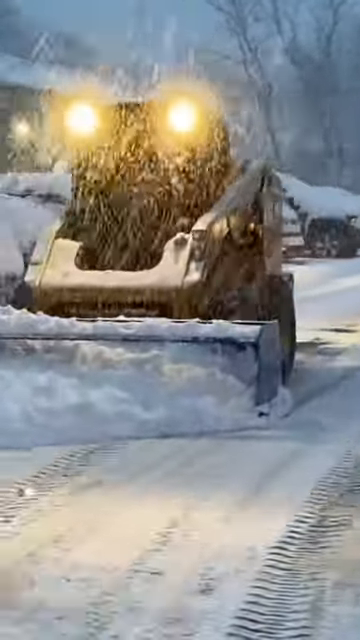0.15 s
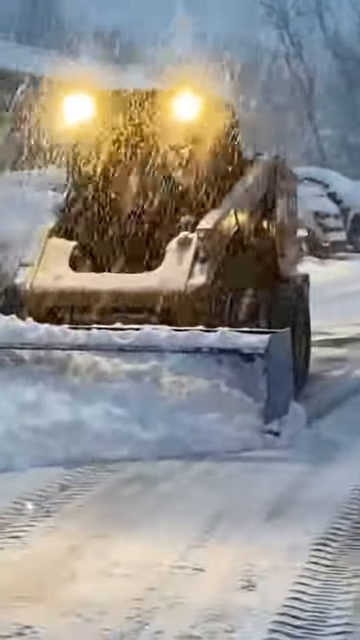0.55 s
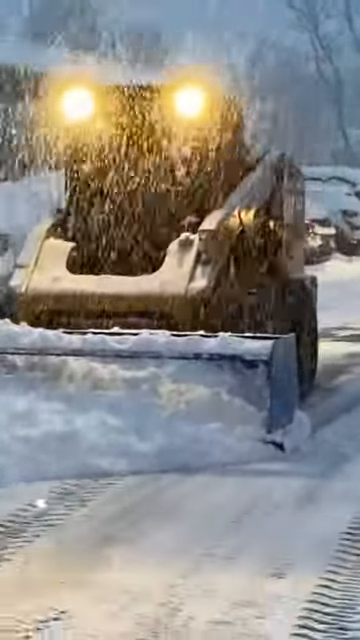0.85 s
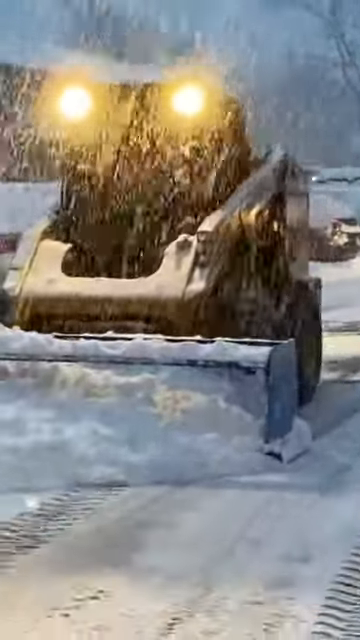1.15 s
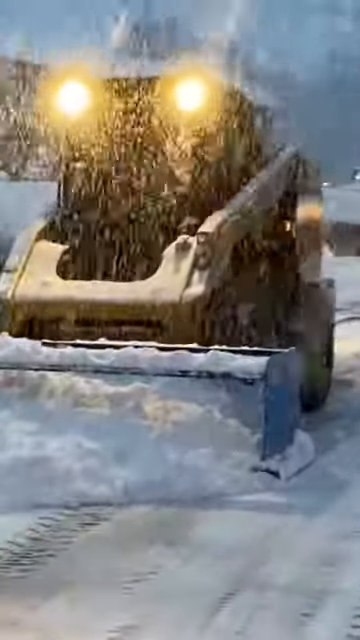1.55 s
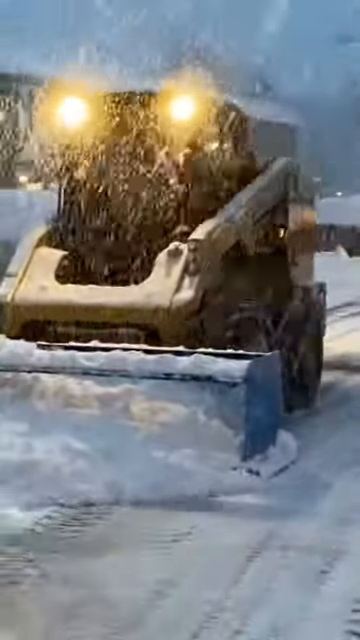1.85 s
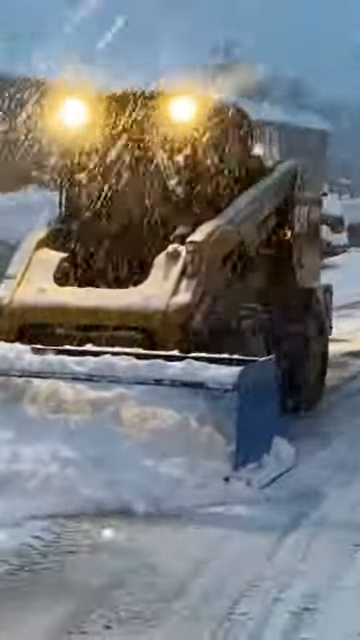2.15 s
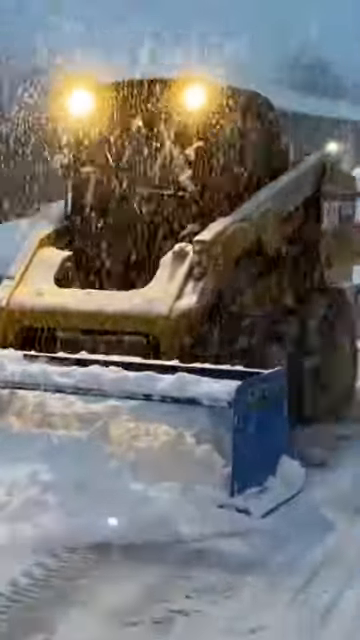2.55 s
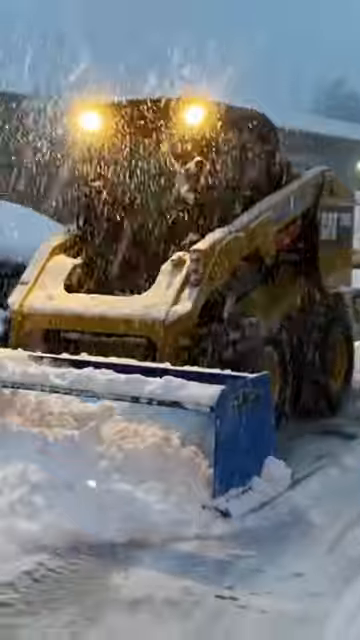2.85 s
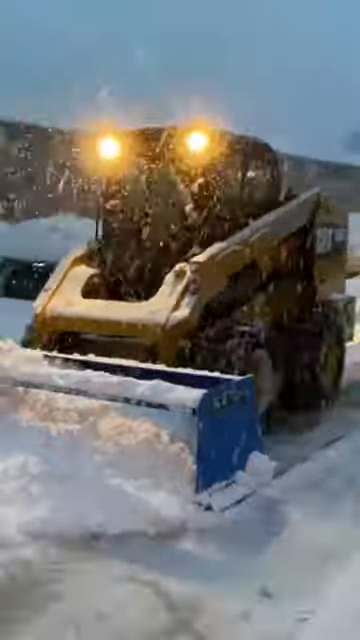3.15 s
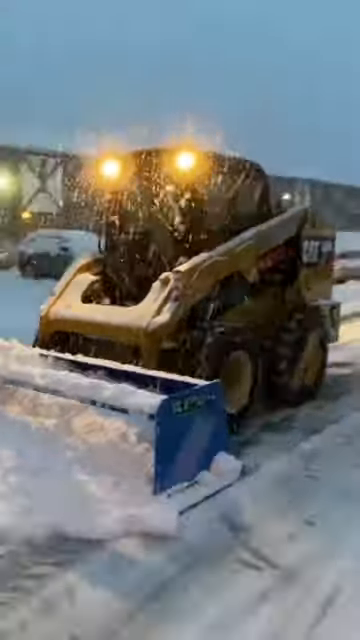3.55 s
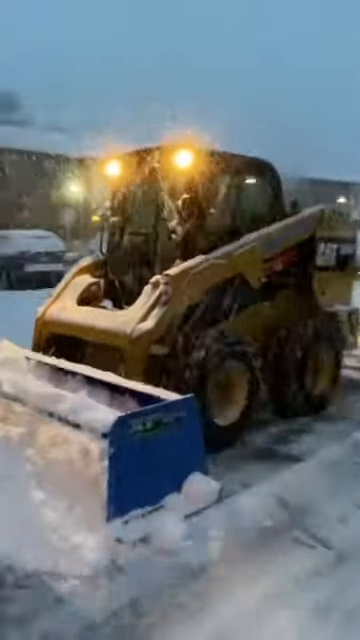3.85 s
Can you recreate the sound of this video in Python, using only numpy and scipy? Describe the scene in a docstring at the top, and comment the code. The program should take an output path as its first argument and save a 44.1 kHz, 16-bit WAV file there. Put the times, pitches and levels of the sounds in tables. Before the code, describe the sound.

A four-cylinder diesel loader drones at nearly constant engine speed, a low buzz near 70 Hz under rough clatter and airy hiss. Faint ticks come at the start and a dull low bump near 1 s. Clatter swells as it nears; pump whine strengthens after 2.6 s with a small knock. From about 3 s faint scraping joins, the sound widens rightward, and it is loudest around 3.7 s, with a soft bump, still running at the end.

```python
"""A diesel drone under steady clatter and hiss: a four-cylinder loader pushes snow across an open lot,
draws near and passes to the right. Exhaust is sines on the firing rate, pump and gear whine is
tones on shaft multiples, and block clatter is noise that partly repeats each engine cycle. Fan air and
sliding snow are the fresh noise in it; ticks, blade bumps and scrapes are swelling noise bands."""
import sys
import numpy as np
from scipy import signal
from scipy.fft import rfft, irfft
from scipy.io import wavfile

SR = 44100
rng = np.random.default_rng(int(sys.argv[2]) if len(sys.argv) > 2 else 0)


def log_audio(samples):
    """Write samples as a 16-bit WAV file to the path given in sys.argv[1]."""
    # one column per channel
    frames = np.atleast_2d(samples).T
    # limit to full scale, then quantise
    limited = np.clip(frames, -1, 1)
    pcm = np.round(limited * 32767).astype(np.int16)
    wavfile.write(sys.argv[1], SR, pcm)


N = 175959


def amp(db):
    """Decibels to gain."""
    return 10 ** (np.asarray(db) / 20)


def rms_one(x):
    """Scale to unit rms."""
    return x / np.sqrt(np.mean(x ** 2) + 1e-20)


def in_time(rows):
    """Columns of a time table, interpolated at every sample."""
    s, *columns = np.transpose(rows)
    return [np.interp(np.arange(N) / SR, s, c) for c in columns]


def bin_hz():
    """Frequency of every FFT bin."""
    return np.arange(N // 2 + 1) * SR / N


def at_hz(points):
    """A frequency table at every FFT bin, interpolated over log frequency."""
    table_hz, values = np.transpose(points)
    return np.interp(np.log(np.maximum(bin_hz(), 1)), np.log(table_hz), values)


def drift(pole_hz):
    """Slow random curve of about unit rms: noise through a double real pole, at SR / 40."""
    step, settle = 40, 2000
    r = np.exp(-2 * np.pi * pole_hz * step / SR)
    noise = rng.standard_normal(N // step + 2 + settle)
    slow = signal.lfilter([1], [1, -2 * r, r * r], noise)[settle:]
    return np.interp(np.arange(N) / step, np.arange(len(slow)), rms_one(slow))


def panned(x, pan_db):
    """Stereo pair with the given left minus right level."""
    return np.array([x * amp(pan_db / 2), x * amp(-pan_db / 2)])


def exhaust(cycle, level_db):
    """Downward pressure pulses as sines; multiples between the firings come from unequal cylinders."""
    # exhaust tones: multiple of the four-firing cycle, relative_level_db
    exhaust_tones = [(3, -18), (4, 1), (5, -17.5), (6, -20), (7, -16), (8, -7), (10, -25.5), (11, -23),
                     (12, -17.5), (16, -27)]
    firing_waver_db, odd_waver_db = .5, 2.5
    out = 0
    for k, db in exhaust_tones:
        k = round(k)
        if k % 4 == 0:
            start_rad, waver_db = 0, firing_waver_db
        else:
            # uneven strokes slip in phase
            start_rad = rng.uniform(0, 2 * np.pi) + drift(0.89)
            waver_db = odd_waver_db
        gain = amp(db + waver_db * drift(2.15))
        out = out - gain * np.cos(2 * np.pi * k * cycle + start_rad)
    return np.sqrt(2) * amp(level_db) * out


def shaft_tone(cycle, multiple):
    """Unit-rms tone locked to the shaft, blurred by its uneven turning."""
    jitter_cycles = .0006
    turns = cycle + jitter_cycles * drift(16.0)
    return np.sqrt(2) * np.cos(2 * np.pi * (round(multiple) * turns + rng.random()))


def whine(cycle, near):
    """Pump pistons and gear teeth meet at shaft multiples; one pump partial rises with load."""
    # second partial of the piston pump: time_s, level_db
    pump_load = [(0, -55), (.7, -58), (1.1, -48.5), (1.6, -45), (2.5, -48), (2.66, -36), (3.2, -34.5),
                 (3.6, -36.5), (3.99, -33)]
    # pump and gear tones: multiple of the cycle (rounded in use), far_db, near_db,
    # pan_db (left minus right, scaled by nearness)
    whine_tones = [(18, -38, -39, 2.5), (24, -56.5, -47, 9), (32, -55, -41, -10), (48, -50.5, -41.5, -8),
                   (54, -55, -57, 7), (72, -57, -48.5, -10), (107.7, -66, -62, -19),
                   (145.2, -61.5, -59, 13), (160.8, -61.5, -55.5, 1), (182.6, -76, -59, -6),
                   (189, -64, -63, 6), (213, -86, -59, -2)]
    pump_multiple, pump_pan_db, pump_waver_db = 36, -8, 1.6
    waver_db = .25  # per root of the multiple
    [load_db] = in_time(pump_load)
    pump_gain = amp(load_db + pump_waver_db * drift(6.2))
    out = panned(pump_gain * shaft_tone(cycle, pump_multiple), pump_pan_db)
    for k, far_db, near_db, pan_db in whine_tones:
        distance_db = far_db + near * (near_db - far_db)
        gain = amp(distance_db + waver_db * np.sqrt(k) * drift(2.7))
        out += panned(gain * shaft_tone(cycle, k), pan_db * near - 1.5)
    return out


def repeating_contacts(cycle):
    """Contacts that recur each cycle: four noise loops whose drifting weights slowly renew the pattern."""
    loop_samples, renew_hz = 2600, 1.76
    loops = rng.standard_normal((4, loop_samples))
    weights = np.array([drift(renew_hz) for _ in loops])
    position = (cycle % 1 * loop_samples).astype(int)
    return np.sum(weights * loops[:, position], axis=0) / np.linalg.norm(weights, axis=0)


def patchy(x):
    """Each half octave swells and sinks on its own; the upper middle also follows its level curve."""
    # upper middle leads the approach, then eases: time_s, level_db
    presence = [(0, -1), (.7, 1.5), (1.5, 1.5), (2.3, 1.5), (3.0, 1), (3.4, -0.5), (3.7, -2), (3.99, -1.5)]
    low_hz, high_hz, patchy_db = 1100, 6000, .7
    [presence_db] = in_time(presence)
    spectrum = rfft(x)

    def half_octave(hz):
        return 2 * np.log2(1 + hz / 150)  # bands widen below about 150 Hz, spanning more than half an octave

    band = np.round(half_octave(bin_hz()))
    out = 0
    for k in np.unique(band):
        in_middle = half_octave(low_hz) < k < half_octave(high_hz)
        gain = amp(patchy_db * drift(1.34) + presence_db * in_middle)
        out = out + gain * irfft(spectrum * (band == k), N)
    return out


def clatter_sources(cycle):
    """Spectra of the direct clatter, cyclic contacts mixed with fresh noise, and of a diffuse noise."""
    # power share of the clatter that repeats each cycle: frequency_hz, share_0_to_1
    repeating = [(100, 0.03), (600, 0.29), (1500, 0.45), (4000, 0.45)]
    throb_db = 0.6  # noise swells at each of four firings
    share = np.clip(at_hz(repeating), 0, 1)
    throb = amp(throb_db * np.cos(2 * np.pi * 4 * cycle))
    fresh, diffuse = rfft(throb * rng.standard_normal((2, N)))
    mixed = np.sqrt(share) * rfft(repeating_contacts(cycle)) + np.sqrt(1 - share) * fresh
    return rfft(patchy(irfft(mixed, N))), diffuse


def side_source(direct, diffuse):
    """Left-right difference: direct sound louder or earlier at the right, the rest diffuse."""
    # power share from the right being louder: frequency_hz, share_0_to_1
    louder_right = [(100, 0), (700, 0.51), (1500, 0.21), (3000, 0.02)]
    # power share from the right being earlier: frequency_hz, share_0_to_1
    earlier_right = [(300, 0.14), (1500, 0.15), (3500, 0.45), (7000, .05)]
    louder = np.clip(at_hz(louder_right), 0, .6)
    earlier = np.clip(at_hz(earlier_right), 0, .4)
    from_right = -(np.sqrt(louder) + 1j * np.sqrt(earlier)) * direct  # 1j: quarter-cycle lead
    return from_right + np.sqrt(1 - louder - earlier) * diffuse


def clatter(cycle, near):
    """Block clatter and hiss, coloured and widened by distance: a far and a near spectrum crossfade."""
    # clatter and hiss spectra: frequency_hz, relative_db_per_hz
    far_colour = [(20,-23), (59,-2), (80,-18), (145,-15), (256,-17), (330,-21), (420,-32.5), (607,-24),
                  (734,-31.5), (850,-24), (1100,-31), (1520,-29), (1750,-36), (2050,-37), (2320,-40),
                  (2760,-37), (3800,-42.5), (6050,-48), (8300,-63), (9800,-70), (12300,-58), (12700,-97),
                  (13700,-69), (14000,-69), (16000,-65)]
    near_colour = [(20,-35), (48,-19), (76,-7), (145,-13), (242,-10), (354,-19.5), (470,-23.5), (640,-10.5),
                   (818,-17.5), (950,-21), (1130,-26.5), (1520,-20.5), (1740,-31.5), (2100,-25.5),
                   (2320,-34.5), (2760,-28), (3450,-34.5), (3700,-31.5), (4150,-36), (5140,-39.5),
                   (7110,-43.5), (8400,-52.5), (9800,-55.5), (10700,-44.5), (12300,-55), (12700,-82),
                   (13700,-80), (14000,-53), (16000,-55)]
    # left-right difference on the same scales: frequency_hz, relative_db_per_hz
    far_side_colour = [(20,-50), (60,-26), (300,-34.5), (700,-57), (1700,-54.5), (2200,-70), (7500,-102),
                       (7800,-58), (10300,-63), (12000,-69), (14400,-66), (14800,-88)]
    near_side_colour = [(20,-48), (70,-17.5), (300,-22.5), (700,-22), (1500,-33.5), (3200,-31), (4300,-38),
                        (5300,-29), (6700,-47), (8000,-43), (10300,-52), (12000,-54), (14400,-50),
                        (14800,-82)]
    far_level_db, near_level_db = -33.5, -27
    # the upper middle widens suddenly late in the pass
    widen_s, widen_rise_s, wide_low_hz, wide_high_hz = 2.8, 0.017, 1800, 7940

    direct, diffuse = clatter_sources(cycle)
    apart = side_source(direct, diffuse)
    far_mid = irfft(amp(at_hz(far_colour)) * direct, N)
    far_side = irfft(amp(at_hz(far_side_colour)) * apart, N)
    near_mid = irfft(amp(at_hz(near_colour)) * direct, N)
    near_apart = amp(at_hz(near_side_colour)) * apart
    in_wide = (bin_hz() > wide_low_hz) & (bin_hz() < wide_high_hz)
    widening = np.clip((np.arange(N) / SR - widen_s) / widen_rise_s, 0, 1)
    near_side = irfft(near_apart * ~in_wide, N) + widening * irfft(near_apart * in_wide, N)

    sign = np.array([[1], [-1]])  # left, right
    far = rms_one(far_mid + sign * far_side)
    close = rms_one(near_mid + sign * near_side)
    near = np.clip(near, 0, 1.2)
    return (1 - near) * amp(far_level_db) * far + near * amp(near_level_db) * close


def burst(start_s, level_db, low_hz, high_hz, length_s):
    """A noise band that swells to its level at a third of the length, then dies away."""
    t = np.maximum(np.arange(N) / SR - start_s, 0) / length_s
    band = signal.butter(2, [low_hz, high_hz], "band", fs=SR, output="sos")
    noise = rms_one(signal.sosfilt(band, rng.standard_normal(N)))
    return amp(level_db) * noise * (3 * t * np.exp(1 - 3 * t))


def ticks():
    """Short ticks as brief noise bands."""
    # ticks: start_s, level_db, low_hz, high_hz, length_s
    tick_rows = [(.053, -45, 2100, 2220, .014), (.053, -46, 2470, 2580, .014),
                 (1.026, -59, 7800, 15500, .009), (2.590, -27, 550, 850, .008)]
    return sum(burst(*row) for row in tick_rows)


def swells(rows):
    """Noise bands a little above each base frequency, begun half a length before the listed time."""
    out = 0
    for time_s, level_db, base_hz, length_s in rows:
        out = out + burst(time_s - length_s / 2, level_db, base_hz / 0.88, base_hz * 1.58, length_s)
    return out


def bumps():
    """Dull bumps of blade and chassis as short low noise bands."""
    # bumps: time_s, level_db, base_hz, length_s
    bump_rows = [(1.05, -28, 70.6, 0.11), (3.699, -32, 202, 0.065)]
    return swells(bump_rows)


def scrapes():
    """The blade scrapes harder for a moment: longer, higher noise bands."""
    # scrapes: time_s, level_db, base_hz, length_s
    scrape_rows = [(3.05, -46, 1100, 0.44), (3.3, -55.5, 2860, 0.69), (4.05, -53, 5800, 0.58)]
    return swells(scrape_rows)


def scene():
    """Exhaust, whine, clatter and knocks on one engine cycle and one approach."""
    # engine: time_s, four_firing_cycle_hz, exhaust_level_db
    engine = [(0, 17.17, -25), (.3, 17.36, -26), (.55, 17.31, -26.5), (.9, 17.18, -25.5), (1.15, 17.0, -25),
              (1.5, 17.06, -24), (2.25, 17.11, -23.5), (2.5, 16.96, -24), (2.7, 17.09, -24),
              (3.1, 17.11, -24), (3.99, 17.01, -23)]
    # approach: time_s, nearness (0 far, 1 close)
    nearness = [(0, 0.017), (.7, 0.038), (1.2, 0.092), (1.7, 0.17), (2.2, 0.29), (2.7, 0.44), (3.1, 0.57),
                (3.5, 0.78), (3.7, 1), (3.99, 0.93)]
    cycle_hz, level_db = in_time(engine)
    [near] = in_time(nearness)
    cycle = np.cumsum(cycle_hz) / SR
    knocks = ticks() + bumps() + scrapes()
    body = panned(exhaust(cycle, level_db) + knocks, -0.3 - 0.95 * near)
    return body + whine(cycle, near) + clatter(cycle, near)


def record(dry):
    """The microphone loses the deepest bass; the top is cut steeply."""
    bass_cut_hz, top_stop_hz, stop_db = 30, 15860, 60
    high_pass = signal.butter(2, bass_cut_hz, "high", fs=SR, output="sos")
    low_pass = signal.cheby2(24, stop_db, top_stop_hz, fs=SR, output="sos")
    return signal.sosfilt(low_pass, signal.sosfilt(high_pass, dry))


dry = scene()
out = record(dry)
log_audio(out)
```